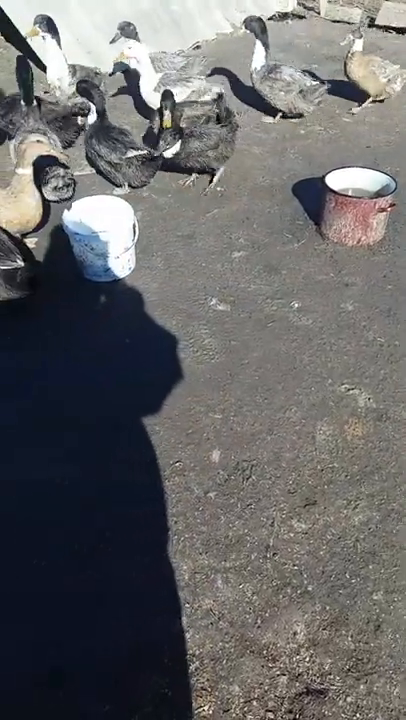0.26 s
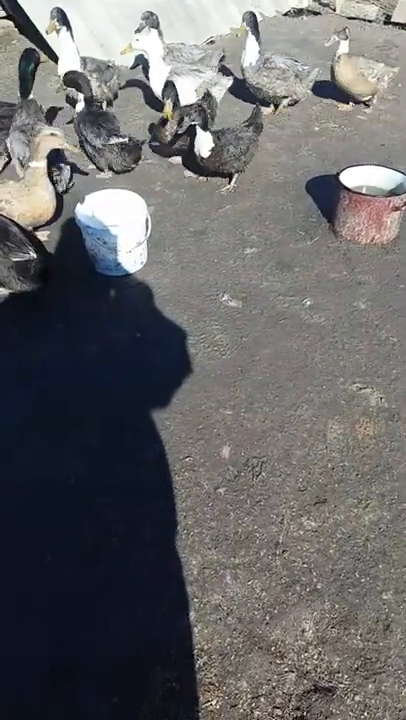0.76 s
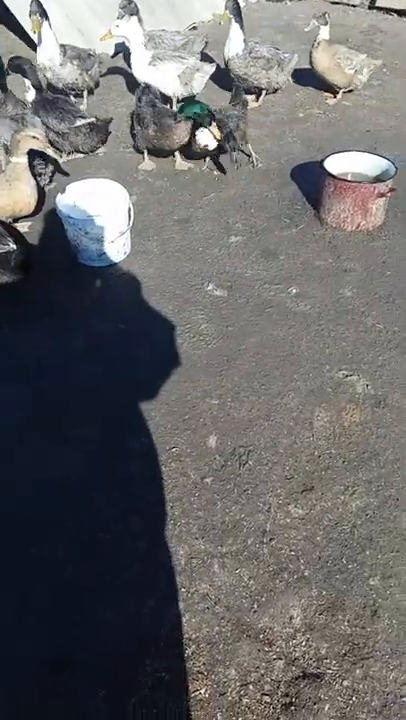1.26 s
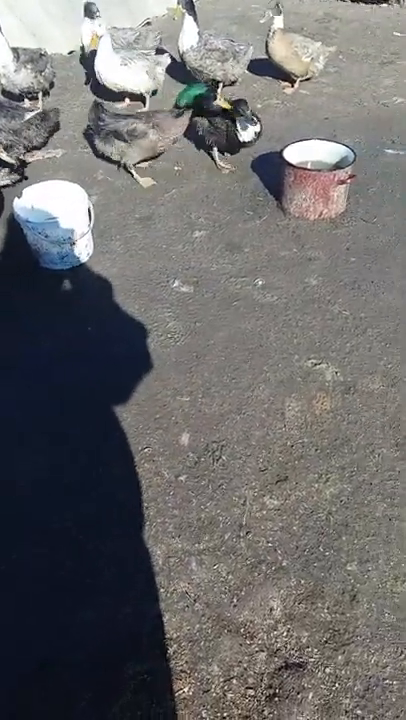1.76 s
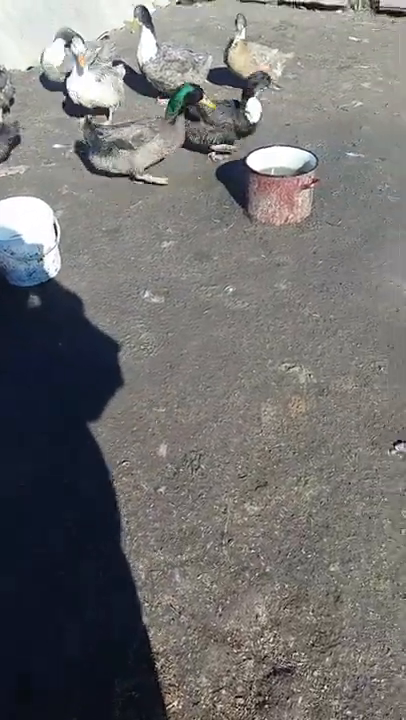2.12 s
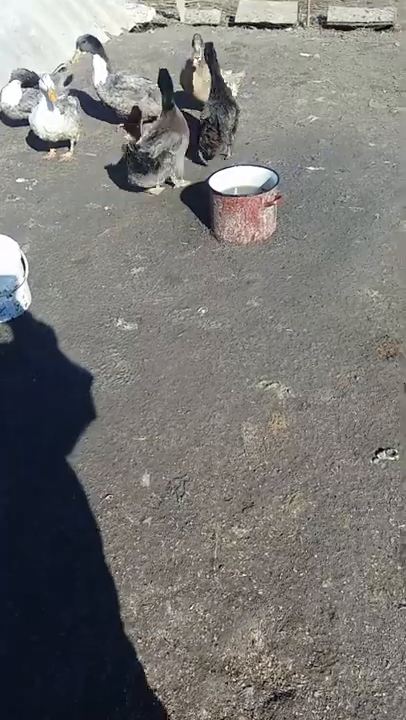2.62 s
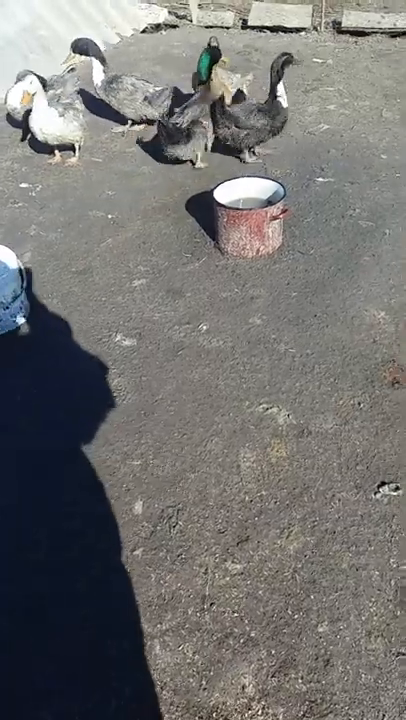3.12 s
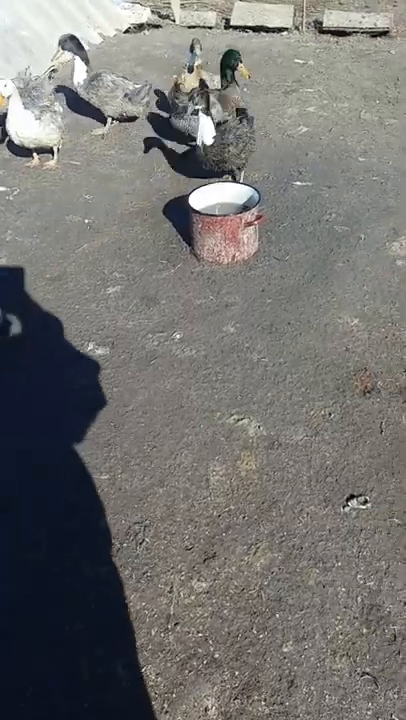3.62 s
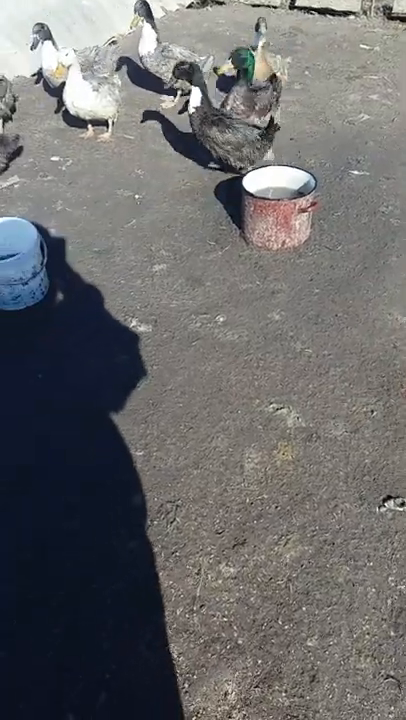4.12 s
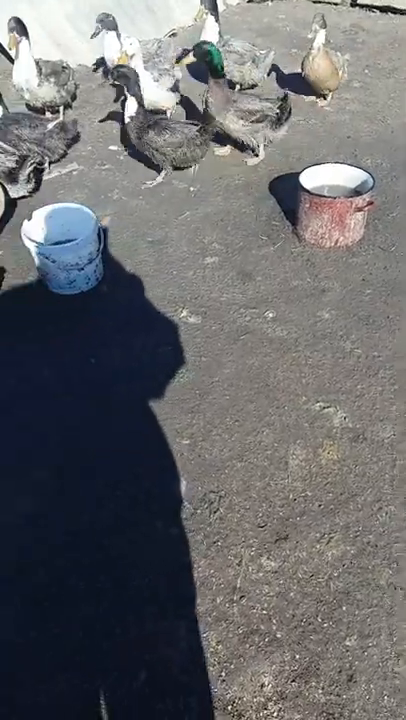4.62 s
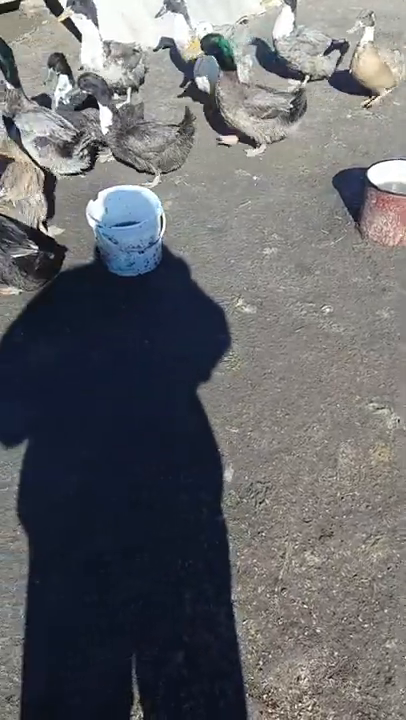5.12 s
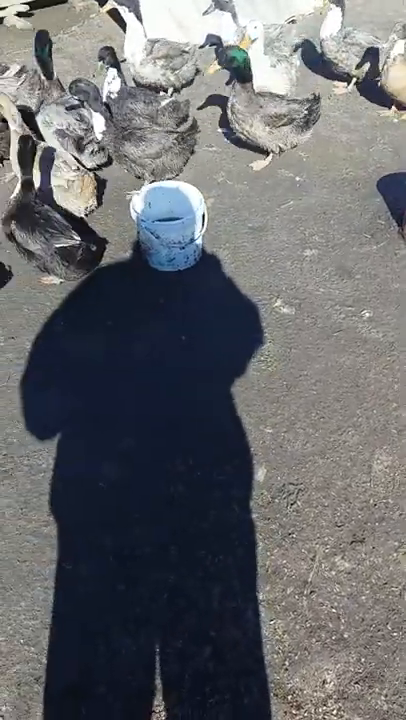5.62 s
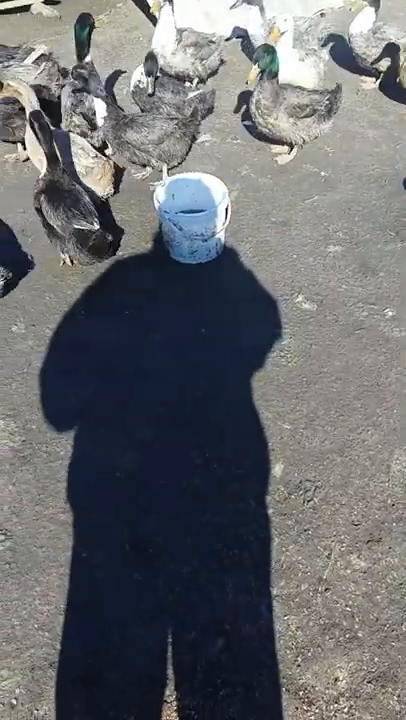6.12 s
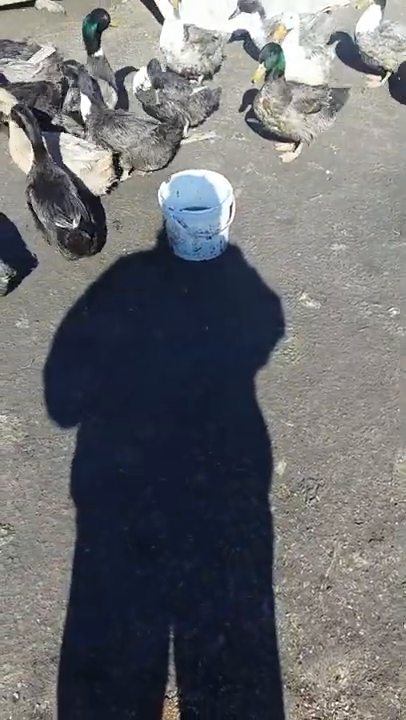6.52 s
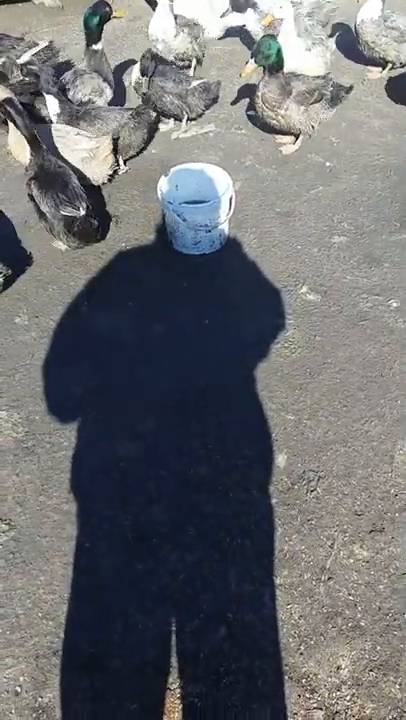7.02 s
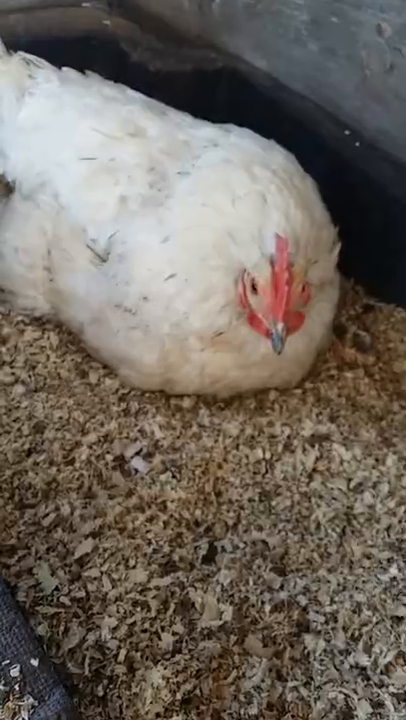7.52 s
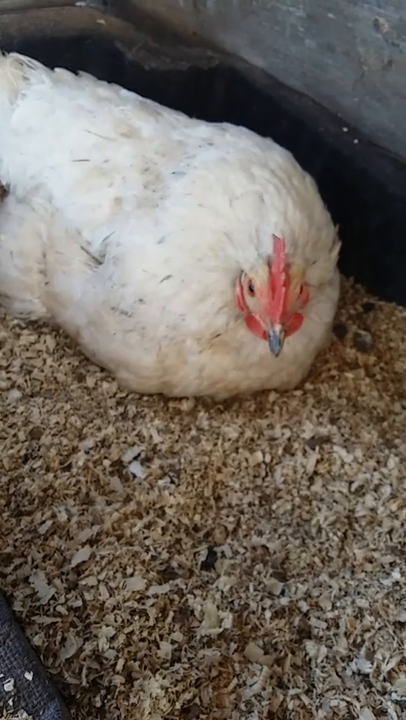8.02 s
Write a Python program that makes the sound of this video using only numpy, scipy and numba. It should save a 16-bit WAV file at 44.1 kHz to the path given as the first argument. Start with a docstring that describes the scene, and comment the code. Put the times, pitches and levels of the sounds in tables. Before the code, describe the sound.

Dense overlapping duck chatter in an open yard, thin birdsong and growing wind thumps, cutting abruptly to a hushed coop where a hen clucks faintly.

```python
"""A duck flock gabbles in an open farmyard a few metres from a phone: uneven claps ring throat and bill resonances.
A small songbird repeats two near-sine notes, a steady low sine hums far off and a few gliding whistles sound.
From about 5 s gusts, low swings and slaps of noise, buffet mainly the left, later the right microphone port.
After a brief near-silence the phone is inside a coop: wind, a hen's soft harmonic clucks, a gliding whistle,
the bird faint outside. Filtered noise rustles behind both places."""
import sys
import numpy as np
from scipy import signal
from scipy.io import wavfile
from scipy.ndimage import uniform_filter1d
from numba import njit

SR = 44100
rng = np.random.default_rng(int(sys.argv[2]) if len(sys.argv) > 2 else 0)


def transcribe(signal):
    """Save signal, clipped to [-1, 1], as a 16-bit WAV file at the path in sys.argv[1]."""
    frames = np.atleast_2d(signal).T
    limited = np.clip(frames, -1, 1)
    pcm = np.round(limited * 32767).astype(np.int16)
    wavfile.write(sys.argv[1], SR, pcm)


N = 364266  # length in samples
YARD_ENDS_S, COOP_STARTS_S = 7.179, 7.212


def undb(db):
    """Turn decibels into an amplitude factor."""
    return 10 ** (np.asarray(db) / 20)


def level(x, db):
    """Scale a sound to an RMS level in dB."""
    return x * undb(db) / np.sqrt(np.mean(x ** 2))


def ring(x, hz, width):
    """Two-pole resonance, gain 1 at the centre; width in Hz."""
    return signal.lfilter(*signal.iirpeak(hz, hz / width, fs=SR), x)


@njit
def glide(x, hz, width):
    """State-variable resonance whose centre moves sample by sample; width in Hz."""
    y, band, low = np.empty(len(x)), 0., 0.
    for i in range(len(x)):
        g, damping = np.tan(np.pi * hz[i] / SR), width / hz[i]
        v = (band + g * (x[i] - low)) / (1 + g * (g + damping))
        band, low, y[i] = 2 * v - band, low + 2 * g * v, damping * v
    return y


def cut(x, hz, kind, order=2):
    """Butterworth filter: low, high or band."""
    return signal.sosfilt(signal.butter(order, hz, kind, fs=SR, output="sos"), x)


def walk(rate):
    """Random levels held 1 / rate s and slewed twice; RMS 1."""
    k = int(SR / rate)
    steps = np.repeat(rng.standard_normal(N // k + 1), k)
    slewed = uniform_filter1d(uniform_filter1d(steps, k), k)
    return level(slewed[:N], 0)


def curve(table):
    """Draw straight lines through a table's columns over time."""
    s, *columns = np.transpose(table)
    return np.array([np.interp(np.arange(N) / SR, s, c) for c in columns])


def add(out, s, sound, lag, pan_db=0.):
    """Place a sound; positive lag [samples] delays the left port, positive pan favours it."""
    for ch, sign in enumerate((1, -1)):
        start = max(int(s * SR + sign * lag / 2), 0)
        out[ch, start:start + len(sound)] += undb(sign * pan_db / 2) * sound[:max(N - start, 0)]


def swell(length, rise=0.02, fall=0.01):
    """Time axis and effort of one call: smooth rise, hold and fall; all in s."""
    t = np.arange(int((length + rise + fall + 0.028) * SR)) / SR
    rising = np.clip(t / rise, 0, 1)
    falling = np.clip((length + rise / 2 + fall / 2 - t) / fall, 0, 1)
    return t, np.sin(np.pi / 2 * rising * falling) ** 2


def quack(length, db, pitch_hz, throat_hz, bill_db):
    """The syrinx claps shut once a cycle, unevenly; claps ring throat and bill, the chest adds the bare pitch."""
    t, effort = swell(length, rise=min(0.012 + .3 * length, .024), fall=0.015 + .2 * length)
    cycles, bird = rng.standard_normal((64, 3)).T, rng.standard_normal(6)
    along = t / t[-1]
    cycles = cycles * min(.03 / length, 1)  # long calls run steadier

    # the pitch arches; every cycle has its own length and force, lengths steadiest in raspy calls
    uneven = np.clip(.03 - .001 * bill_db, .02, .07)
    arch = 1 + 0.13 * (np.sin(np.pi * along) - .8)
    travelled = .7 + np.cumsum(pitch_hz * arch) / SR
    phase = np.interp(travelled, np.cumsum(1 + uneven * cycles[0]), np.arange(64))
    cycle = phase.astype(int)
    claps = np.diff(np.floor(phase), prepend=0) * undb(2.6 * cycles[1][cycle])
    breath = np.exp(-(phase % 1) / .3) * rng.standard_normal(len(t))  # dies away after each clap
    drive = effort * (level(claps, 0) + .25 * breath)
    rasp = effort ** 2 * (level(claps, 0) + .4 * breath)

    # ground and neighbours' bodies smear each call a little
    smear = .04 * rng.standard_normal(500) * np.exp(-np.arange(500) / 130)
    smear[0] = 1
    drive, rasp = signal.fftconvolve([drive, rasp], [smear])[:, :len(t)]

    # resonances rise as the bill opens, slide as the neck moves and shift clap by clap
    shape = 1 + .08 * (effort - .9) + .09 * bird[0] * (along - .45) + .045 * cycles[2][cycle]
    size = np.exp(.05 * bird[1:])  # each call's body is built a little differently
    throat = glide(glide(drive, throat_hz * shape, 200.0), throat_hz * shape, 1400.0)
    throat = throat + 0.26 * glide(drive, 1000 * size[0] * shape, 330.)
    throat = throat + 0.15 * glide(glide(rasp, 2650 * size[1] * shape, 230.0), 2600 * shape, 2300.0)
    neck = cut(throat, [500, 3800], "band")  # what a duck's neck lets through

    bill = 0.48 * glide(rasp, 7300 * shape, 1200.0)
    for hz, width, gain in ((3500 * size[2] ** .5, 600., 1), (4400 * size[3] ** .5, 500., .8),
                            (5250 * size[4] ** .5, 600., .3)):
        centre_hz = hz * shape ** .5
        bill = bill + gain * glide(glide(rasp, centre_hz, width), centre_hz, 3 * width)

    # a raspy call carries more chest tone, a low one less
    chest = effort * (np.sin(2 * np.pi * phase) + 0.27 * np.sin(4 * np.pi * phase))
    chest_db = min(bill_db * 0.19 - 4.0, -4)
    chest = level(chest, db + chest_db) * min(pitch_hz / 210, 1) ** 3

    held = np.sqrt(np.mean(effort ** 2))  # keeps the pauses in the buffer from raising the call
    return -held * (level(neck, db) + level(bill, db + max(bill_db, -24)) + chest)


def ducks():
    """Near birds call from the table; the rest of the flock joins in at random, mostly while they call."""
    # near quacks: (time [s], length [s], level [dB], pitch [Hz], throat [Hz],
    #               bill rasp [dB against the level, at least -24])
    near_calls = [(0.013, 0.037, -21.5, 239.9, 1160, -41), (0.124, 0.039, -22.5, 279, 1297, -48),
                  (0.264, 0.034, -21.5, 236.8, 1575, -46.5), (0.417, 0.019, -20.5, 171, 1334, -60),
                  (0.523, 0.024, -28.5, 142.5, 1360, -32), (0.575, 0.05, -32, 203.3, 1390, -5),
                  (0.648, 0.014, -23, 141, 1372, -25.5), (0.719, 0.017, -24, 190, 1318, -11.5),
                  (0.757, 0.024, -29.5, 189.9, 1070, -9), (0.847, 0.023, -22, 205.3, 1386, -12.5),
                  (0.88, 0.045, -33, 170.5, 649, -26), (0.951, 0.018, -17.5, 180.9, 1406, -72.5),
                  (0.987, 0.026, -33.5, 107.6, 812, -11.5), (1.069, 0.029, -26, 192, 853, -31),
                  (1.121, 0.035, -18.5, 207.8, 1448, -55.5), (1.209, 0.026, -24.5, 152, 1410, -48),
                  (1.296, 0.032, -24, 210.5, 1840, -11.5), (1.349, 0.03, -27, 181, 1516, -21),
                  (1.376, 0.063, -21.5, 244, 1950, -2), (1.419, 0.036, -22, 199.6, 1496, -25),
                  (1.497, 0.042, -23.5, 233.6, 1670, -3), (1.559, 0.029, -24, 183.2, 1424, -30),
                  (1.645, 0.032, -21, 198.7, 1330, -25), (1.684, 0.028, -20, 231.8, 1690, -11.5),
                  (1.756, 0.092, -23, 223.5, 1665, 0), (1.849, 0.031, -20, 240.2, 1306, -5),
                  (1.899, 0.027, -24, 214.7, 1800, -25), (1.988, 0.047, -25.5, 210.4, 1633, -12.5),
                  (2.071, 0.049, -19, 224, 1746, -23.5), (2.1, 0.039, -21.5, 185, 1257, -13.5),
                  (2.213, 0.06, -36, 190.3, 1530, -1), (2.282, 0.037, -29.5, 179.6, 1940, -16),
                  (2.324, 0.0064, -27.5, 160.7, 1330, -45), (2.414, 0.076, -31, 188.7, 1770, -26),
                  (2.453, 0.035, -15.5, 286.9, 1406, -33.5), (2.486, 0.017, -19.5, 201.2, 1433, -8),
                  (2.603, 0.029, -28, 172, 1227, -31), (2.633, 0.015, -19, 152.6, 1386, -29),
                  (2.738, 0.039, -29, 187.8, 1586, -9.5), (2.779, 0.022, -20.5, 159, 1350, -50),
                  (2.927, 0.026, -24, 159.6, 1303, -46.5), (2.981, 0.033, -26.5, 196.4, 1456, -17),
                  (3.045, 0.04, -24.5, 240.4, 1277, -26.5), (3.193, 0.16, -37, 222, 1035, -10),
                  (3.289, 0.051, -28.5, 198.3, 1302, -15), (3.395, 0.015, -29.5, 196, 1480, -39),
                  (3.503, 0.068, -28, 257, 1176, -8), (3.577, 0.045, -34, 110.7, 2010, -8.5),
                  (3.645, 0.0097, -34.5, 201.7, 1217, -32.5), (3.745, 0.021, -37.5, 211.3, 854, -24.5),
                  (3.808, 0.027, -24.5, 250, 1038, -11.5), (3.925, 0.013, -21, 212, 1202, -22.5),
                  (4.051, 0.017, -21, 237.7, 1374, -33.5), (4.106, 0.029, -20.5, 188.5, 1315, -29.5),
                  (4.191, 0.014, -21.5, 155.7, 1584, -41), (4.238, 0.019, -28.5, 177.4, 1238, -18),
                  (4.275, 0.067, -31, 287, 1325, -48.5), (4.375, 0.014, -29.5, 153.6, 1050, -33),
                  (4.473, 0.028, -31.5, 155.7, 1118, -25), (4.514, 0.03, -27.5, 135, 1360, -17.5),
                  (4.582, 0.024, -30.5, 193, 1310, -16), (4.759, 0.019, -24.5, 211, 1333, -30),
                  (4.871, 0.023, -21.5, 201, 1357, -53.5), (4.998, 0.017, -28, 203.7, 1285, -30.5),
                  (5.058, 0.01, -36.5, 209.4, 1245, -24.5), (5.268, 0.026, -38.5, 195.8, 1232, -33.5),
                  (5.309, 0.043, -38, 195.1, 1490, -16), (5.512, 0.027, -27.5, 225, 1545, -16),
                  (5.544, 0.055, -39, 198, 1527, -14), (5.74, 0.016, -38, 188.7, 1490, -21.5),
                  (5.686, 0.017, -28, 163.3, 1530, -20), (5.807, 0.028, -27.5, 213, 1490, -17.5),
                  (5.911, 0.021, -29, 143.7, 1580, -15), (5.941, 0.037, -29, 146.6, 815, -45),
                  (6.032, 0.024, -34.5, 224.2, 1545, -35), (6.164, 0.034, -29.5, 199.2, 1493, -20),
                  (6.208, 0.082, -32, 214, 906, -48), (6.257, 0.033, -24.5, 198.7, 1353, -6.5),
                  (6.449, 0.03, -31.5, 212.5, 926, -2.5), (6.557, 0.038, -28, 194.1, 1485, 2),
                  (6.701, 0.026, -24.5, 238.4, 1456, 4.5), (6.838, 0.029, -26.5, 227.1, 1397, 2.5),
                  (6.971, 0.017, -24, 203, 1460, -5.5), (7.093, 0.03, -26, 233.6, 1430, 1.5),
                  (7.177, 0.0081, -23, 219.4, 1480, 3)]
    # murmur of the farther ducks, before it follows the near ones: (time [s], level [dB])
    murmur = [(0, -28.5), (2.6, -34.5), (4.8, -32.5), (5.1, -50.5), (5.6, -45), (7.1, -34.5)]
    flock_per_s = 28
    near, far = np.zeros((2, N)), np.zeros((2, N))
    for row, side in zip(near_calls, rng.uniform(-1, 1, len(near_calls))):
        add(near, row[0] - .012, quack(*row[1:]), 7.2 * side)  # starts early for its rise

    for s, a, b, c, d in rng.random((int(flock_per_s * YARD_ENDS_S), 5)):
        call = quack(0.011 + 0.038 * a, 6 * b, 90 + 130 * c, 700 + 1500 * d, -10.5)
        add(far, s * YARD_ENDS_S, call, 16 * (a - c))

    calling = uniform_filter1d(np.abs(near[0]), int(.07 * SR))
    joining = calling / (calling + .15 * calling.mean())
    return near + level(far, 0) * undb(curve(murmur)) * joining


def songbird():
    """Near-sine notes in pairs, one nearly flat and one falling, louder on the left."""
    # note pairs: (time of the falling note [s], flat note level [dB], falling note level [dB])
    song = [(0, -55, -45), (0.281, -42, -39), (0.57, -42, -45), (0.867, -47, -47.5), (1.903, -43, -42.5),
            (2.894, -51.5, -48.5), (3.188, -48, -47.5), (3.481, -40.5, -35), (3.774, -41.5, -37),
            (4.066, -40.5, -40.5), (4.345, -41, -45.5), (4.669, -51, -43.5), (6.376, -44.5, -46.5),
            (6.678, -38.5, -41.5), (6.962, -38, -39), (7.557, -76, -66), (7.826, -64.5, -78)]
    flat_leads_s = 0.108
    out = np.zeros((2, N))
    for (s, flat_db, db), chance in zip(song, rng.standard_normal((len(song), 2))):
        # start [s], level [dB], length [s], from [Hz], to [Hz]
        notes = (s - flat_leads_s, flat_db, .064, 4030, 3930), (s, db, .055, 4880, 4300)
        for (start, note_db, length, from_hz, to_hz), a in zip(notes, chance):
            t, effort = swell(length, rise=.01)
            # each note settles towards its lower pitch, curls up at its end and flutters
            settling = to_hz + (from_hz - to_hz) * np.exp(-t / 0.038)
            hz = (1 + .003 * a) * (settling + 14200.0 * t ** 2)
            hz = hz + 120 * uniform_filter1d(rng.standard_normal(len(t)), size=100)
            waver = 1 + .22 * np.sin(2 * np.pi * (19 + 4 * a) * t)  # level wavers
            tone = undb(note_db) * effort * waver * np.sin(2 * np.pi * np.cumsum(hz) / SR)
            add(out, start, tone * (start >= 0), 0, pan_db=4.5)  # a note before time zero is dropped
    return out


def buffets():
    """Wind level at each port in dB: a buffet rises fast out of the breeze, holds and dies away."""
    # buffets of wind: (time [s], length [s], level [dB], port)
    gust_table = [(4.897, 0.1, -15.5, "left"), (5.034, 0.072, -26, "left"), (5.321, 0.04, -19.5, "left"),
                  (5.442, 0.043, -17, "left"), (5.742, 0.016, -25.5, "left"), (5.874, 0.011, -19.5, "left"),
                  (6.025, 0.028, -18.5, "left"), (6.11, 0.12, -35, "right"), (6.145, 0.057, -18, "left"),
                  (6.456, 0.006, -19.5, "left"), (6.518, 0.08, -25, "left"), (6.747, 0.019, -19.5, "left"),
                  (6.969, 0.082, -23, "left"), (7.122, 0.027, -24.5, "left"),
                  (7.254, 0.011, -13.5, "right"), (7.315, 0.015, -26.5, "left"),
                  (7.32, 0.15, -21.5, "right"), (7.544, 0.17, -21.5, "right"),
                  (7.787, 0.088, -25.5, "right"), (7.929, 0.012, -23, "right"),
                  (8.018, 0.04, -17.5, "right"), (8.084, 0.16, -22, "right")]
    rise_db_per_s, fall_db_per_s = 511, 299.5
    # breeze between buffets at the left and right port [dB]
    yard_breeze_db, coop_breeze_db = np.array([[-36.5], [-64.]]), np.array([[-42.], [-42.]])
    t = np.arange(N) / SR
    out = np.where(t < COOP_STARTS_S, yard_breeze_db, coop_breeze_db)
    for s, length, db, port in gust_table:
        before = rise_db_per_s * np.clip(s - t, 0, None)
        after = fall_db_per_s * np.clip(t - s - length, 0, None)
        ch = ("left", "right").index(port)
        out[ch] = np.maximum(out[ch], db - before - after)
    # the air is still until the first buffet approaches
    still = rise_db_per_s * np.clip(gust_table[0][0] - t, 0, None)
    return out - still * (out <= yard_breeze_db.max())


def wind():
    """Eddies rock each port on its own at a wandering rate; stronger puffs swing quicker and slap harder."""
    out = []
    for gust_db in buffets():
        puff = walk(45)
        rate_hz = 90 * np.exp(.25 * puff + 0.36 * walk(150))
        swing = undb(2 * puff + 2 * walk(120)) * np.sin(2 * np.pi * np.cumsum(rate_hz) / SR)
        slap_db = np.minimum(4.9 * puff + 6.1 * walk(90), 8)
        slap = undb(slap_db) * cut(ring(rng.standard_normal(N), 194, 170), 300, "low")
        out.append(undb(gust_db) * cut(level(swing, 0) + level(slap, -8.0), 57.6, "high", order=5))
    return np.array(out)


def hen():
    """Soft clucks: four clean harmonics under one swell."""
    # hen clucks: (time [s], length [s], level before the harmonics' own gains [dB], pitch [Hz])
    clucks = [(7.544, 0.021, -49.5, 278.4), (8.151, 0.0244, -50, 274), (8.21, 0.096, -56, 284)]
    out = np.zeros((2, N))
    for s, length, db, hz in clucks:
        t, effort = swell(length)
        harmonics_db = (10, -1.0, 1, -15)
        tone = sum(undb(g) * np.sin(2 * np.pi * hz * k * t) for k, g in enumerate(harmonics_db, 1))
        add(out, s, undb(db) * effort * tone, 0)
    return out


def squeaks():
    """Clean single tones whose glide quickens towards the end."""
    # short gliding whistles: (time [s], length [s], level [dB], from [Hz], to [Hz])
    whistles = [(3.19, 0.023, -34, 1200, 686), (3.7, 0.048, -52, 1620, 1200),
                (4.725, 0.02, -38, 1840, 1500), (7.905, 0.02, -58.5, 3030, 4600)]
    out = np.zeros((2, N))
    for s, length, db, from_hz, to_hz in whistles:
        t, effort = swell(length)
        hz = from_hz + (to_hz - from_hz) * np.clip(t / length, 0, 1) ** 2
        add(out, s, undb(db) * effort * np.sin(2 * np.pi * np.cumsum(hz) / SR), 0)
    return out


def hum():
    """A steady low sine, alike at both ports."""
    return undb(-51) * np.sin(2 * np.pi * 73.4 * np.arange(N) / SR)


def air(db, low_hz, top_hz):
    """Background rustle: a band of noise, nearly alike at both ports in the bass."""
    mid, side = rng.standard_normal((2, N))
    both = mid + cut(side, 2000, "high", order=1) * np.array([[1], [-1]])
    return level(cut(cut(both, top_hz, "low"), low_hz, "high", order=4), db)


def echoes(x, t60, db, top_hz=3500):
    """Reflections return a short, dull, different tail to each port; t60 in s."""
    t = np.arange(int(t60 * SR)) / SR
    noise = cut(rng.standard_normal((2, len(t))), [400, top_hz], "band", order=1)
    tail = noise * 1000 ** (-t / t60) * (t > .006)  # 60 dB down after t60
    tail = tail / np.sqrt(np.sum(tail ** 2) / 2)
    return x + undb(db) * signal.fftconvolve(x, tail, axes=1)[:, :N]


def scene():
    """The yard, a brief gap, then the coop; gusts and whistles sound in both places."""
    t = np.arange(N) / SR
    yard, coop = t < YARD_ENDS_S, t > COOP_STARTS_S
    bird = echoes(songbird(), 0.17, -8.0, top_hz=6000)
    outside = echoes(ducks(), .26, -14.0) + bird + hum()
    outside = outside + air(-45.0, 76, 300) + air(-57, 350, 2100) + air(-62.5, 1300, 4500)
    inside = hen() + echoes(bird * coop, 0.22, -2, top_hz=6000)
    inside = inside + air(-62.5, 150, 1300) + air(-72.0, 1500, 3600)
    return yard * outside + coop * inside + (yard | coop) * (wind() + squeaks())


def record(dry):
    """The phone's ports differ in the treble, fall off above 5 kHz and add a faint hiss."""
    ports = dry + ring(dry, 5000, 1200) * np.array([[.4], [-.55]])
    wet = cut(ports, 5300, "low", order=6) + undb(-25) * cut(ports, 8300, "low", order=6)
    wet = wet + undb(-73.5) * rng.standard_normal(dry.shape)
    # nothing much passes above 15.5 kHz
    return signal.sosfilt(signal.ellip(10, .2, 80, 15500, fs=SR, output="sos"), wet)


dry = scene()
out = record(dry)
transcribe(out)
```